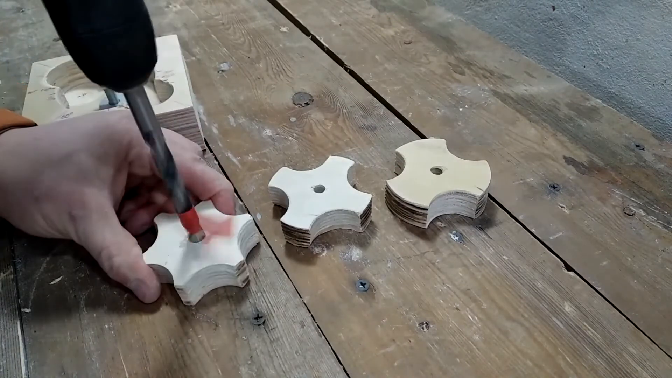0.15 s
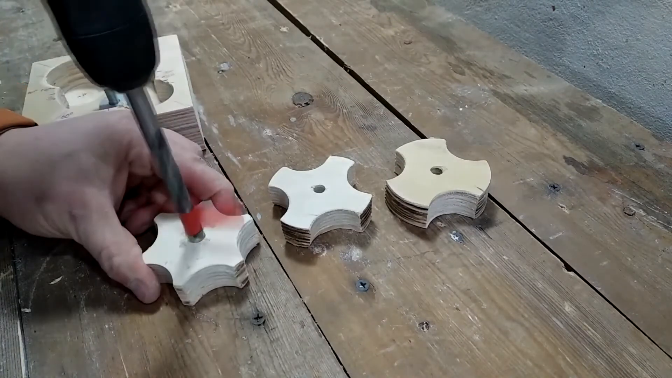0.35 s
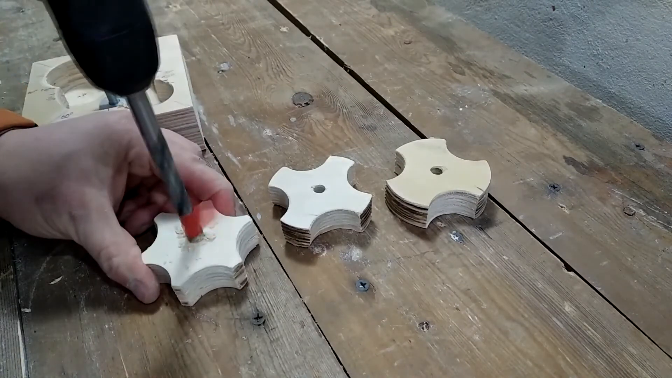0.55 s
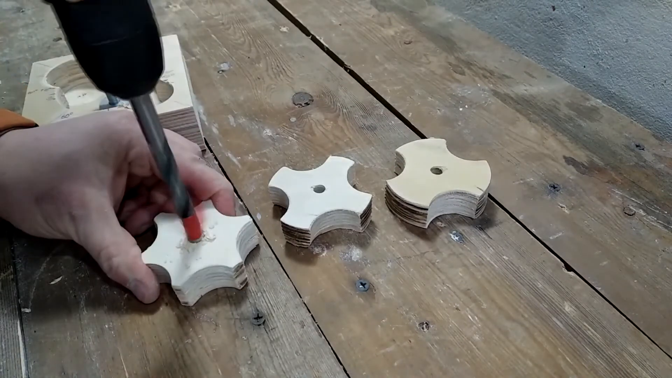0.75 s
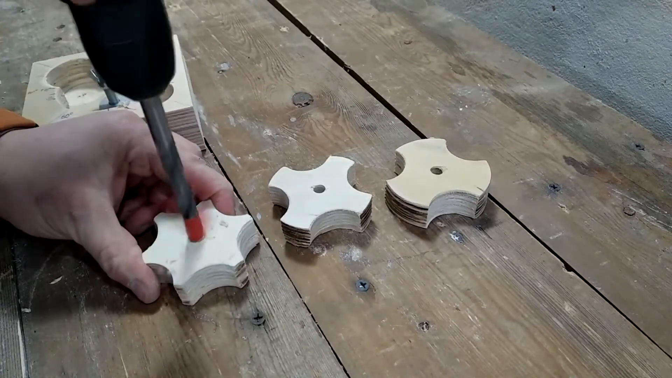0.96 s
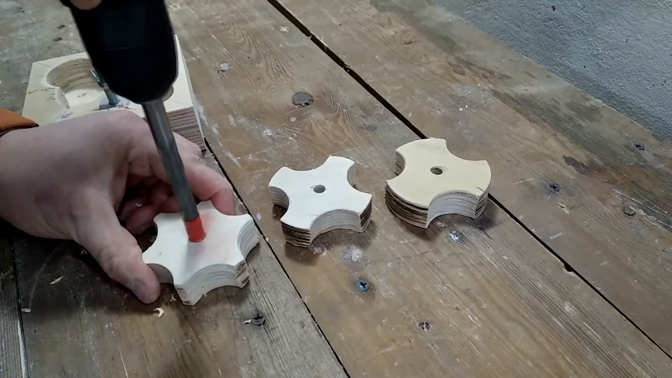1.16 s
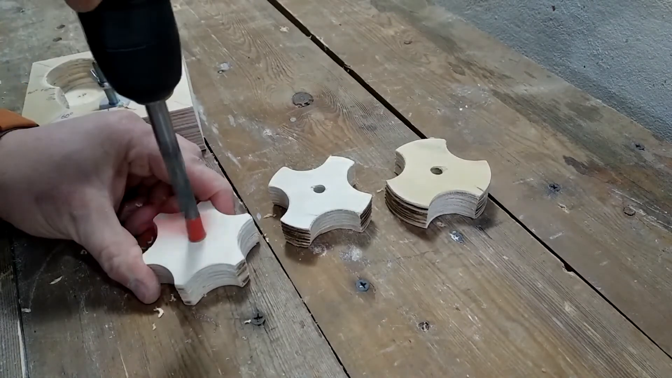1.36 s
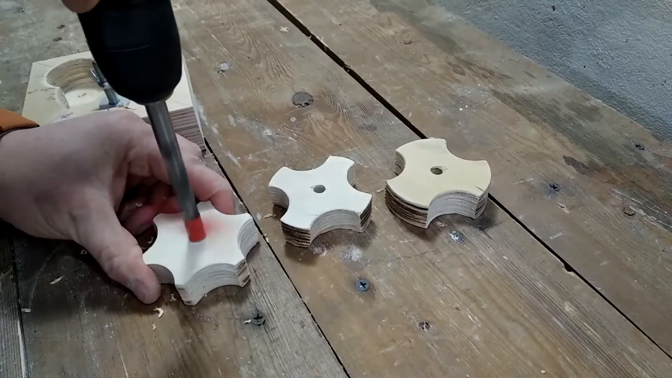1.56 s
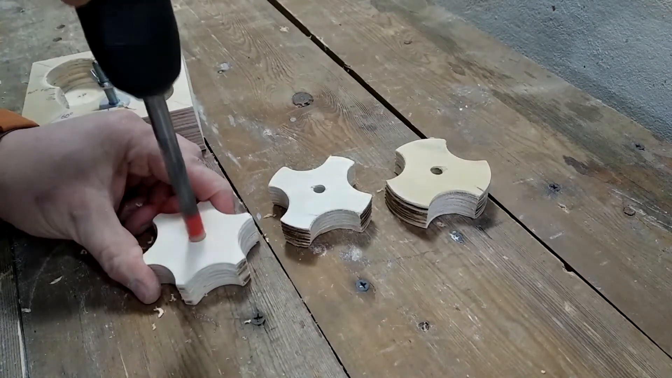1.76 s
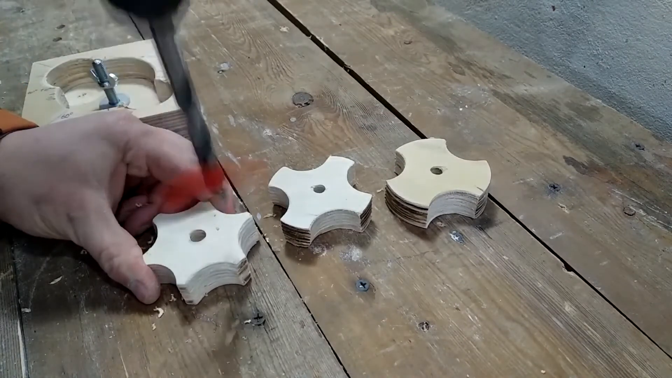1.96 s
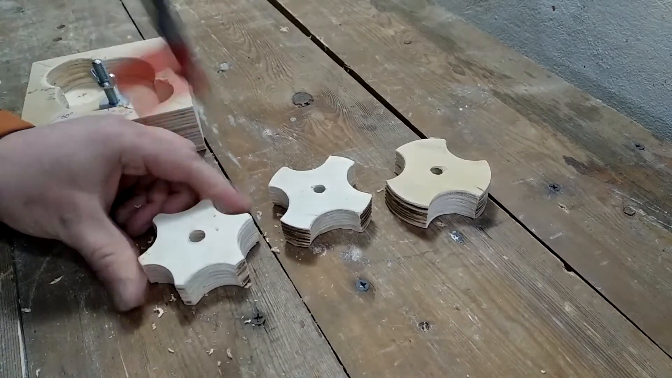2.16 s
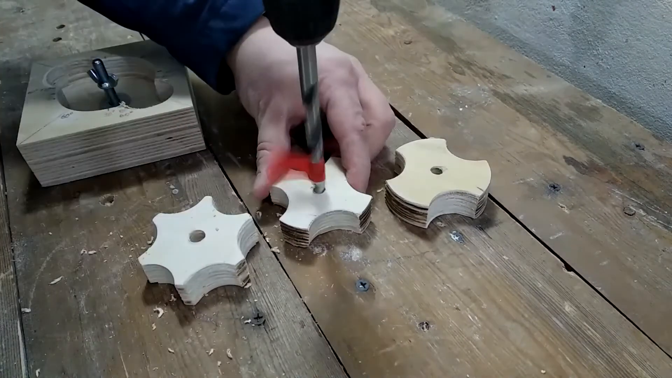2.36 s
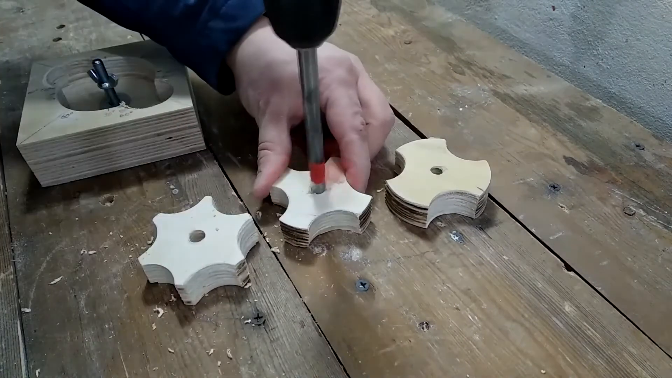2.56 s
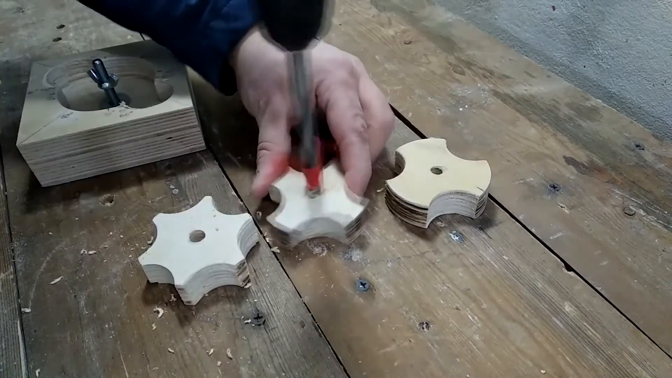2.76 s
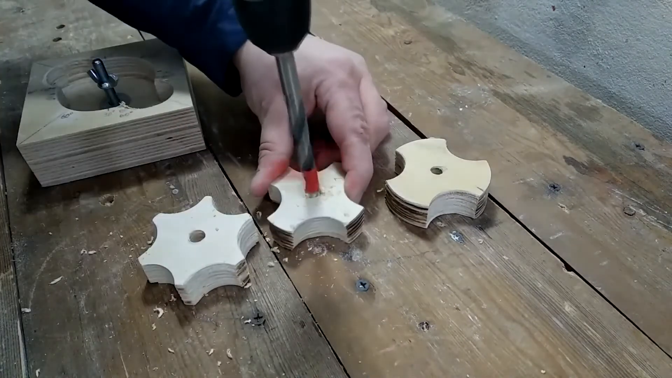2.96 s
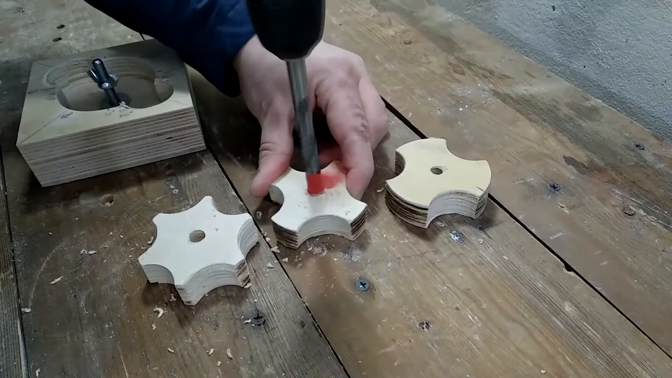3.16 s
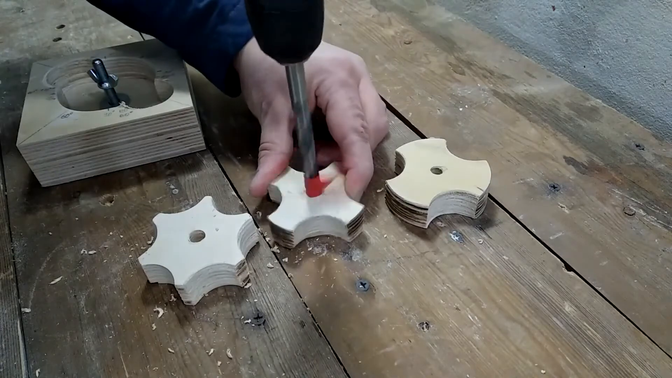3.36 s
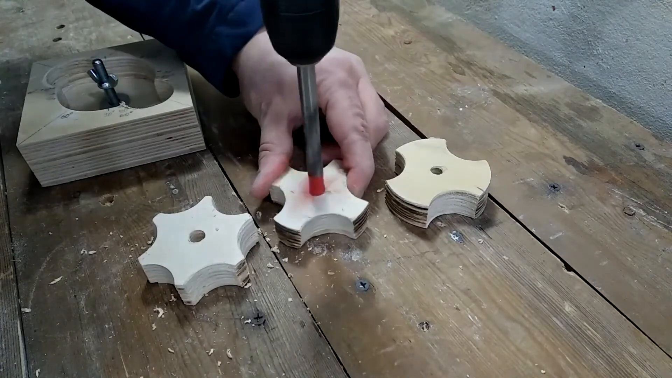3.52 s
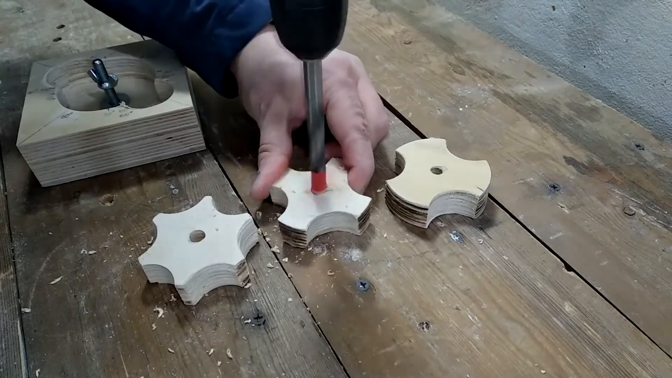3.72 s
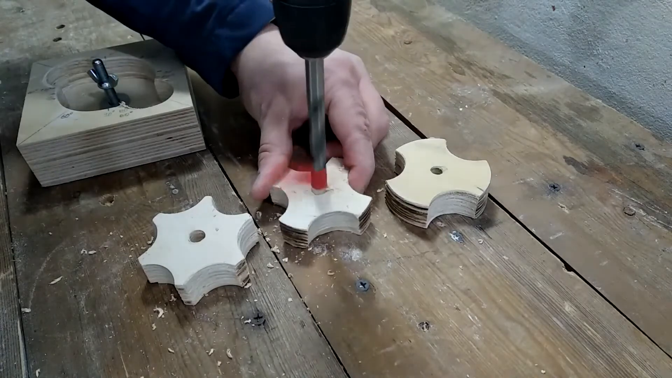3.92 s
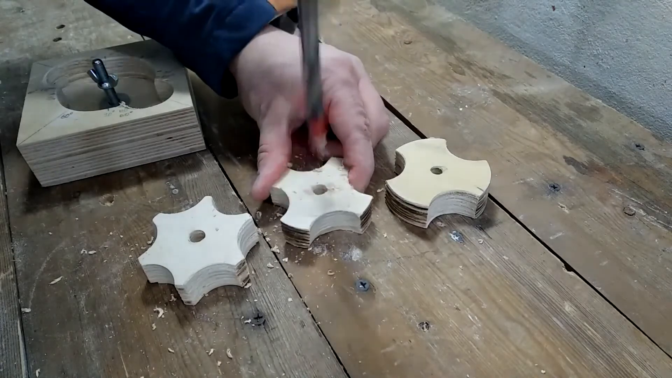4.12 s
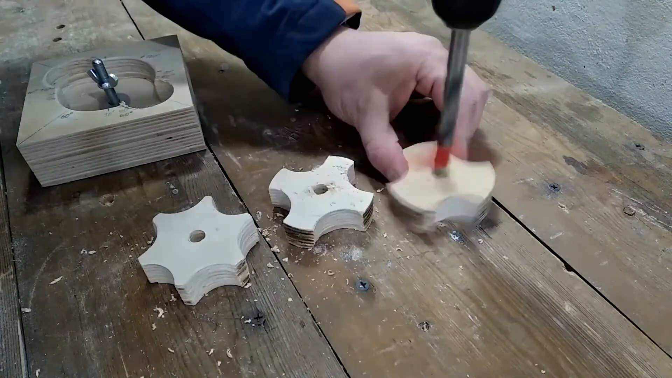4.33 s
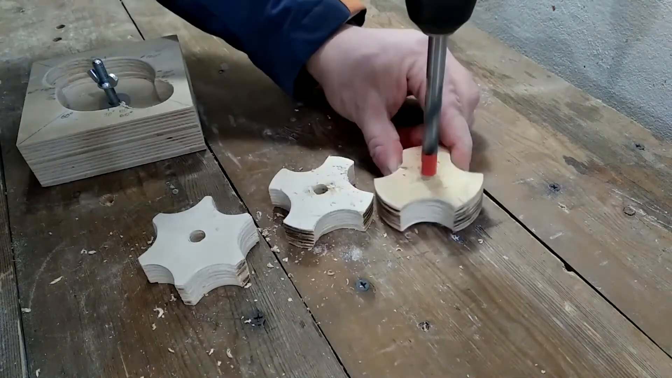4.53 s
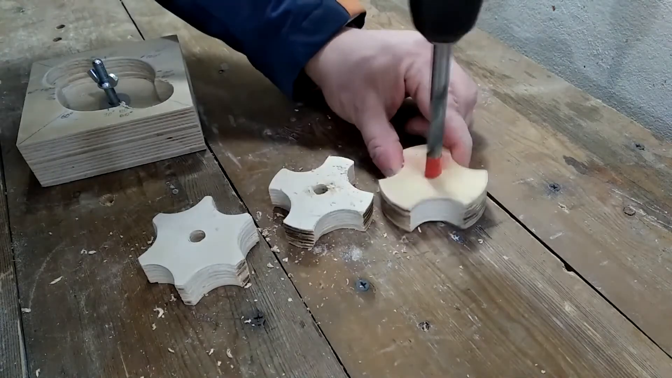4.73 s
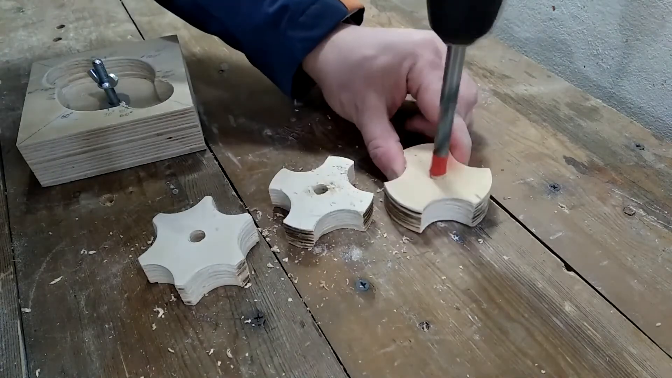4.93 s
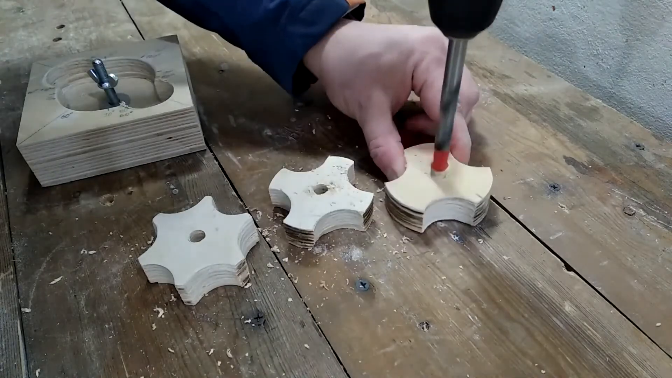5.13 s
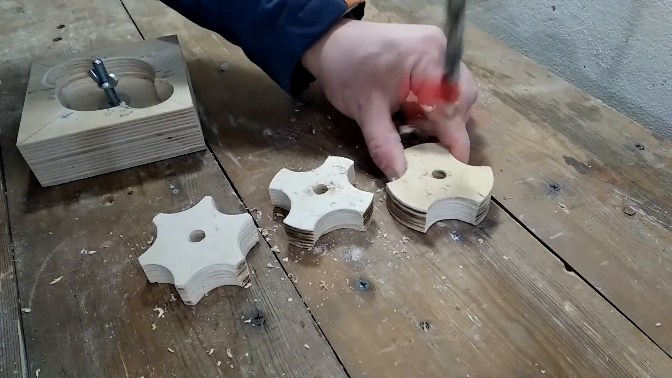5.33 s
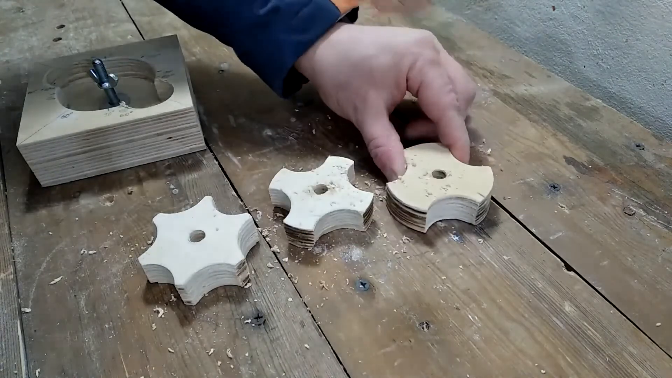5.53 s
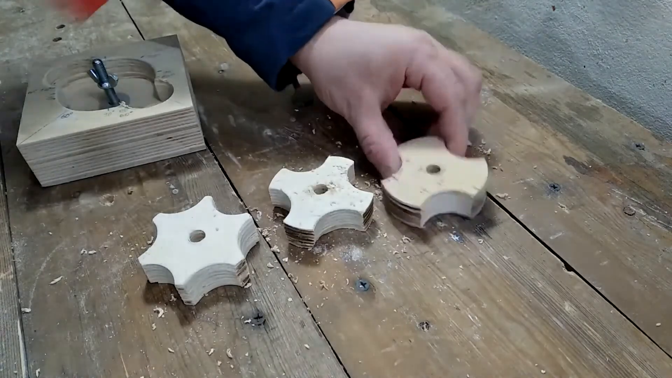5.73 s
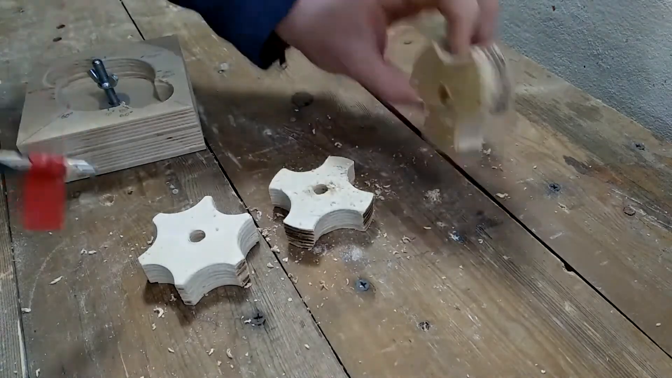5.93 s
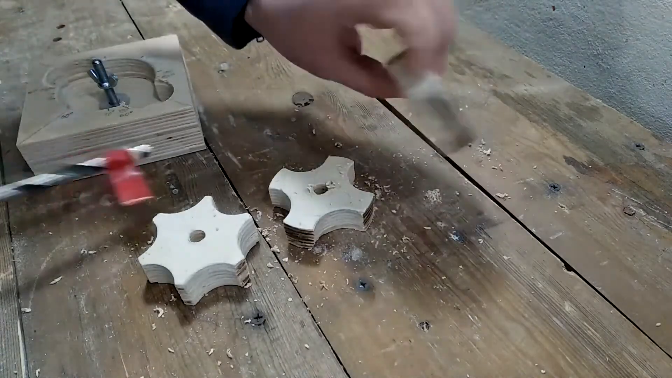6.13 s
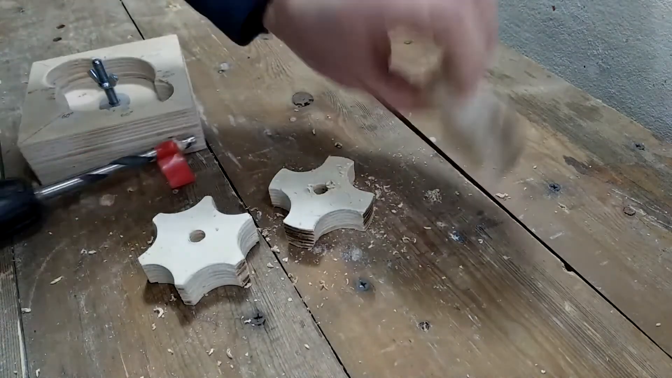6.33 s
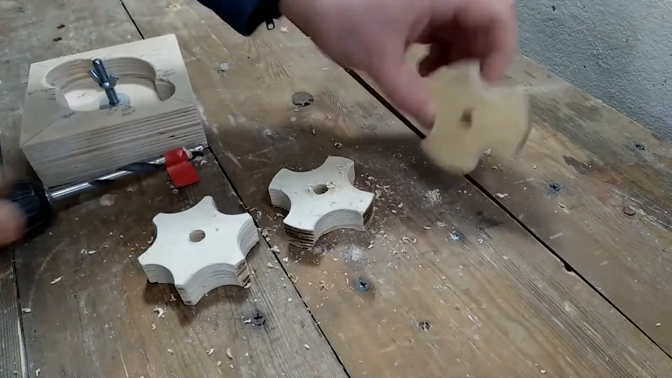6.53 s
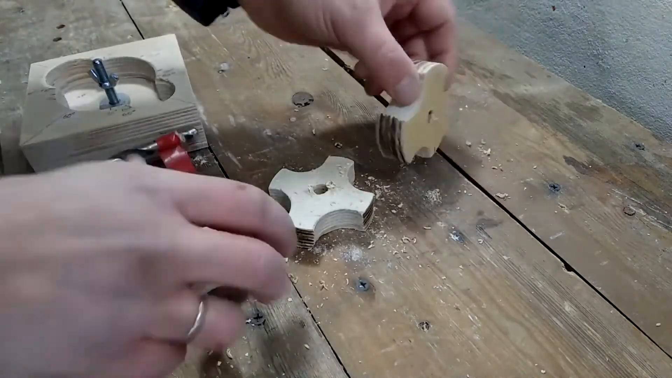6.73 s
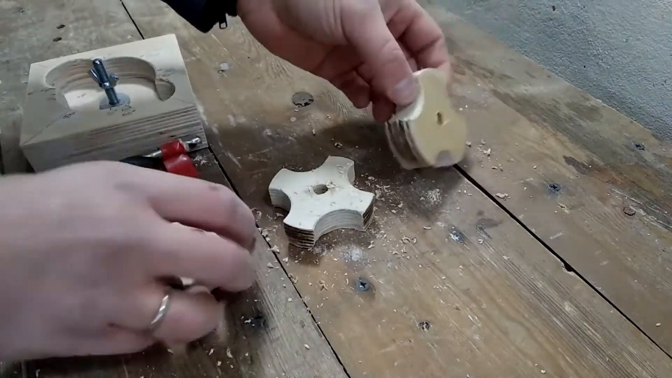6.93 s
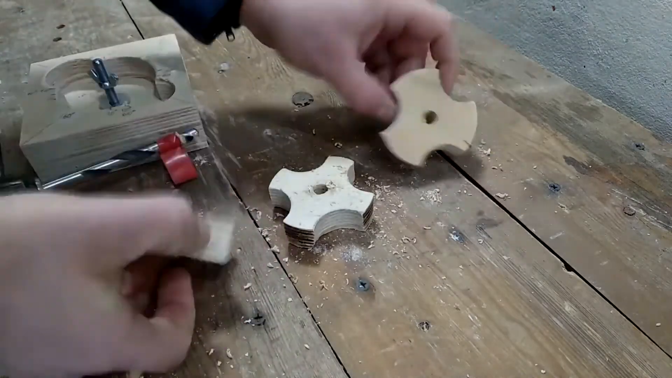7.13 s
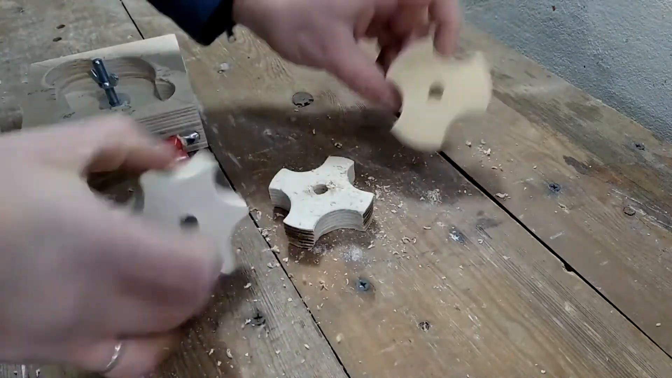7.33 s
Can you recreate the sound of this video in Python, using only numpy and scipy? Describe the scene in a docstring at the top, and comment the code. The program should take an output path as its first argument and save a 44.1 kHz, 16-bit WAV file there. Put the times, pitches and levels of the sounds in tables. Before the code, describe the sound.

Close by in a small workshop, a drill bit tears through plywood three times with short breaks between, hissing and scratching over a motor whine that dips and climbs. Brief high squeals and a rough groan come from the binding bit. After the drilling stops, cloth brushes softly, the drill is set down with a quick clatter, and a few wooden knocks thud and ring on the bench planks.

```python
"""A cordless drill rasps and whines, boring out three plywood knobs on a plank bench in three short bouts.
The bit tears fibres, pinches chips, squeals and groans by stick-slip, and snags as it is pulled out;
the motor's whine glides with the shaft speed. Then a sleeve rustles, the drill is put down and the
knobs knock on the planks, which thud, ring and rattle in a small workshop."""
import sys
import numpy as np
from scipy import signal
from scipy.fft import rfft, irfft, next_fast_len
from scipy.io import wavfile

SR = 44100
rng = np.random.default_rng(int(sys.argv[2]) if len(sys.argv) > 2 else 0)


def unload_wav(signal):
    """Save mono or channel-first audio to the path in sys.argv[1] as 16-bit WAV at rate SR, clipped to [-1, 1]."""
    wavfile.write(
        sys.argv[1],
        SR,
        np.round(np.clip(np.atleast_2d(signal).T, -1, 1) * 32767).astype(np.int16),
    )


N = 329868
TIME = np.arange(N) / SR
# how hard the bit cuts, per bout: (time [s], feed [dB])
FEED_CURVES = [
    [(0.0, -42), (0.03, -40.5), (0.28, -44.5), (0.31, -38), (0.59, -36.5), (0.62, -40), (0.71, -38.5),
     (2.0, -31.5), (2.05, -30.5)],
    [(2.335, -86), (2.345, -53), (2.548, -35.5), (2.824, -33), (2.834, -31), (2.954, -36), (3.162, -33.5),
     (4.084, -34), (4.21, -40)],
    [(4.22, -61), (4.26, -42), (4.33, -30.5), (4.43, -27.5), (4.646, -27), (4.66, -31), (4.728, -26),
     (5.278, -43), (5.504, -38), (5.53, -44)],
]


def amp(db):
    """Decibels to gain."""
    return 10 ** (np.asarray(db) / 20)


def unit(x):
    """Scale to rms 1."""
    return x / np.sqrt(np.mean(x ** 2) + 1e-20)


def read(points, hz):
    """Interpolate a table over log frequency."""
    f, value = np.transpose(points)
    return np.interp(np.log(hz + 1), np.log(f + 1), value)


def level(s, db, fade_s=0.0012):
    """Gain along a dB curve, dying quickly outside it."""
    outside_s = np.maximum(np.maximum(s[0] - TIME, TIME - s[-1]), 0)
    return amp(np.interp(TIME, s, db)) * np.exp(-outside_s / fade_s)


def feed_gain():
    """Gain that follows the feed through all bouts."""
    return sum(level(*np.transpose(curve)) for curve in FEED_CURVES)


def swell(start_s, length_s, ramp_s):
    """Gain that rises smoothly, holds and falls."""
    inside_s = np.minimum(TIME - start_s, start_s + length_s - TIME)
    return np.sin(np.pi / 2 * np.clip(inside_s / ramp_s, 0, 1))


def colour(x, points):
    """Filter by a spectrum table."""
    size = next_fast_len(x.shape[-1])
    gain = amp(read(points, np.fft.rfftfreq(size, 1 / SR)))
    return irfft(rfft(x, size) * gain, size)[..., :x.shape[-1]]


def noise(size=N):
    """White noise as (mid, side)."""
    return rng.standard_normal((2, size))


def wander(per_s):
    """Random drift of rms 1."""
    return unit(np.interp(TIME * per_s, np.arange(SR), rng.standard_normal(SR)))


def resonate(x, hz, width_hz):
    """One resonance of peak gain 1."""
    return signal.lfilter(*signal.iirpeak(hz, hz / max(width_hz, 2), fs=SR), x)


def body(x, modes):
    """Parallel resonances, each widened and applied twice for deep valleys; rms 1."""
    return unit(sum(amp(db) * resonate(resonate(x, hz, 1.24 * width), hz, 1.24 * width)
                    for hz, width, db in modes))


def add(mix, start_s, sound):
    """Mix a sound in at a time."""
    part = mix[:, max(round(start_s * SR), 0):][:, :sound.shape[-1]]
    part += sound[..., :part.shape[1]]


def fibres(per_s, spread_db, snap_ratio):
    """Fibre snaps of uneven size over smooth friction."""
    snaps = noise() * amp(spread_db * np.minimum(rng.exponential(1, N), 2))
    snaps *= rng.random(N) < per_s / SR
    return unit(snap_ratio * unit(snaps) + noise())


def patchy(x, depth_db, width_hz, length_s):
    """Each band of a rubbing sound swells and fades on its own as the contact shifts."""
    bands = signal.stft(x, SR, nperseg=1024, noverlap=768)[2]
    field = rng.standard_normal(bands.shape[1:])
    for axis, span in enumerate([width_hz * 1024 / SR, length_s * SR / 256]):
        bell = np.exp(-2 * (np.arange(-30, 31) / span) ** 2)
        field = signal.fftconvolve(field, np.expand_dims(bell, 1 - axis), "same")
    bands *= amp(depth_db * np.clip(unit(field), -2, 2))
    return unit(signal.istft(bands, SR, nperseg=1024, noverlap=768)[1][:, :N])


def air(level_db=-67):
    """Steady hush of the workshop's still air."""
    spectrum = [(30, -6.5), (60, -13), (130, 2), (500, 2), (1400, -7), (4000, -10.5), (9000, -6),
                (14400, -9), (16000, -17.5)]  # (frequency [Hz], density [dB])
    return amp(level_db) * unit(colour(noise(), spectrum))


def boring(hiss_db=-1.7, usual_feed_db=-36, rumble_fade_db_per_s=7, rasp_fade_db_per_s=2):
    """The edges tear fibres: chips hiss, bit and knob ring, the bench rumbles; all follow the feed."""
    # cutting noise, per knob: (frequency [Hz], density [dB])
    chip_spectra = [
        [(820, -58), (1400, -5), (2190, 2.5), (2310, -6), (2500, 4.5), (3150, 0), (3450, -1), (3720, -10),
         (4080, 1), (4650, -3.5), (5160, -13.5), (5660, -1.5), (7010, -0.5), (7600, -3.5), (8080, -4),
         (12000, -6), (16000, -14)],
        [(820, -60.5), (1400, -54), (1770, 0), (1940, 12), (2580, 7), (3070, 9.5), (3840, 4), (4210, 5),
         (4520, 5.5), (7450, 9), (10300, 0), (12000, 4.5), (13000, -3), (15100, -2), (16000, -8)],
        [(820, -55), (1400, -5.5), (1700, -10), (1810, -8), (2500, -10), (2850, -20.5), (3260, -12.5),
         (3580, -11.5), (4250, -17), (4760, -11.5), (5200, -6), (5400, -15.5), (5950, -7.5), (11900, -10.5),
         (14900, -19.5), (16000, -20.5)],
    ]
    # resonances: (frequency [Hz], nominal width [Hz], level [dB])
    wood_modes = [
        [(594, 65, 5.5), (1055, 350, 3), (1520, 170, -3)],
        [(564.7, 31, -1), (1007, 700, -5.5), (1566, 131, -12.5)],
        [(616, 190, 6), (946, 250, 4), (1460, 140, -21), (1678, 94, 1.5)],
    ]  # knob and plank, per bout
    steel_modes = [(2615, 650, 6), (2900, 200, 11.5), (3447, 414, 6.5), (4060, 670, 3), (4820, 740, -6.5),
                   (5470, 560, 4.5), (5890, 120, -4), (6930, 68, 6), (7140, 73, -1)]  # bit and chuck
    rumble_modes = [(98, 120, -19), (136.6, 50, 4), (176, 138, 0.5), (253, 30.4, 6), (329, 66, 3.5),
                    (432, 374, 3.5)]  # bench
    # per hole, at the usual feed: (breakthrough [s], rasp [dB], entry rumble [dB], steel ring [dB])
    holes = [(1.95, -40, -42, -68), (3.55, -43, -46.5, -51), (4.7, -46.5, -50, -46)]
    out = np.zeros((2, N))
    bite = amp(.8 * wander(55) + .6 * wander(400))
    tearing = fibres(per_s=1500, spread_db=3.5, snap_ratio=.55) * bite
    tearing = patchy(tearing, depth_db=2.4, width_hz=900, length_s=.02)
    tearing = patchy(tearing, depth_db=5.5, width_hz=41, length_s=.11) * amp(.75 * wander(12))
    steel = body(patchy(tearing, depth_db=3, width_hz=200, length_s=.1), steel_modes)
    bench = body(noise(), rumble_modes) * amp(2 * wander(30))
    for curve, hole, chips, wood in zip(FEED_CURVES, holes, chip_spectra, wood_modes):
        through_s, rasp_db, rumble_db, steel_db = hole
        s, feed_db = np.transpose(curve)
        push_db = feed_db - usual_feed_db
        steadied_db = rumble_fade_db_per_s * np.maximum(TIME - s[0], 0)  # the hole steadies the bit
        freed_db = rasp_fade_db_per_s * np.maximum(TIME - through_s, 0)
        out += level(s, feed_db + hiss_db) * unit(colour(tearing, chips))
        out += level(s, steel_db + .1 * push_db) * steel
        out += level(s, rasp_db + .56 * push_db) * amp(-freed_db) * body(tearing, wood)
        out += level(s, rumble_db + .65 * push_db) * amp(-steadied_db) * bench
    return out


def squeaks(gain_db=-10.5, per_s=120, length_s=.032, low_hz=2900, high_hz=5900, jitter=.075, spread_db=9):
    """Chips pinched in the flutes give a crowd of brief scratchy squeaks that follows the feed."""
    out, window = np.zeros((2, N)), np.hanning(int(length_s * SR))
    for when, pitch, size, side_turns in rng.random((int(per_s * N / SR), 4)):
        hz = low_hz * (high_hz / low_hz) ** pitch * (1 + jitter * rng.standard_normal(len(window)))
        phase = 2 * np.pi * (np.cumsum(hz) / SR + np.array([[0], [side_turns]]))
        add(out, when * N / SR, amp(spread_db * size) * window * np.sin(phase))
    return amp(gain_db) * unit(out) * feed_gain()


def crumbs(gain_db=-13, per_s=45, length_s=.02, low_hz=3300, high_hz=13000, q=14, spread_db=8):
    """Chips crackle out of the flutes: many small pitched crunches and a few large clumps."""
    clumps = [(0.373, 0.013, -32), (0.577, 0.018, -35.5), (0.689, 0.037, -37.5), (0.997, 0.038, -39),
              (1.057, 0.061, -37)]  # (centre [s], length [s], level [dB])
    clump_spectrum = [(1000, -6), (3000, 3), (5200, -7), (5800, -5), (9000, -4.5), (13000, -10),
                      (16000, -10)]  # (frequency [Hz], density [dB])
    crunches, window = np.zeros((2, N)), np.hanning(int(length_s * SR))
    snaps = fibres(per_s=2500, spread_db=3, snap_ratio=2)
    for when, pitch, size in rng.random((int(per_s * N / SR), 3)):
        hz = low_hz * (high_hz / low_hz) ** pitch
        start = int(when * (N - len(window)))
        burst = snaps[:, start:start + len(window)] * window
        add(crunches, start / SR, amp(spread_db * size) * unit(resonate(burst, hz, hz / q)))
    clump_gain = sum(amp(db) * swell(s - span / 2, span, span / 2) for s, span, db in clumps)
    return amp(gain_db) * unit(crunches) * feed_gain() + clump_gain * unit(colour(snaps, clump_spectrum))


def motor(whine_db=-3.5, light_load_hz=450, flutter_db=2.2, growl_db=-50, usual_whine_db=-42):
    """Shaft orders whine, rougher the higher the order and the slower the loaded shaft; gears growl."""
    # motor under trigger and load, per bout: (time [s], shaft speed [Hz], whine [dB])
    speed_curves = [
        [(0.02, 348.7, -49.5), (0.3, 330, -44.5), (0.42, 259.6, -43.5), (0.5, 230, -44.5), (0.6, 190.4, -45),
         (0.68, 227.2, -41.5), (0.745, 231.5, -39.5), (0.82, 191.1, -38), (0.87, 211, -43), (0.91, 232.6, -41),
         (0.97, 193.3, -43), (1.06, 261.8, -39.5), (1.13, 315, -46), (1.18, 307.5, -39), (1.25, 349.6, -38.5),
         (1.33, 366.7, -44), (1.4, 417, -41), (1.46, 453, -38), (1.53, 470, -41), (1.6, 495, -48),
         (1.72, 186, -57), (1.76, 199.4, -30.5), (1.8, 244.8, -46), (1.86, 279.2, -52), (1.93, 296, -44.5),
         (2.04, 265, -37)],
        [(2.79, 350, -38.5), (2.83, 301, -36.5), (2.85, 257, -37), (2.88, 239, -42.5), (2.93, 250.4, -44),
         (3.0, 217, -44.5), (3.05, 254.7, -39), (3.1, 296, -39.5), (3.22, 314, -39), (3.28, 270, -39.5),
         (3.34, 256.9, -47), (3.39, 274.5, -41), (3.42, 229, -42), (3.5, 315.7, -40), (3.54, 334.6, -35),
         (3.57, 380, -39), (3.61, 377, -47), (3.67, 422.5, -52), (3.82, 480, -45.5), (3.96, 345, -58)],
        [(4.86, 357.3, -63), (4.89, 363, -41), (4.96, 387, -58), (5.0, 336.5, -49), (5.05, 299.7, -55),
         (5.12, 406, -72), (5.16, 341.5, -63), (5.2, 302.4, -53), (5.25, 310, -48), (5.32, 385, -60),
         (5.38, 432, -45), (5.44, 439, -56), (5.48, 436, -46)],
    ]
    orders = [(1, 3), (2, -12), (3, 1), (4, -9), (6, -9), (8, -7)]  # (multiple of shaft speed, level [dB])
    radiation = [(200, -23), (290, -14), (350, -13), (450, -4.5), (650, 0.5), (1230, 4.5), (1450, -16.5),
                 (1700, -1), (2800, -3), (4000, -24)]  # from knob and housing: (frequency [Hz], gain [dB])
    housing_modes = [(1090, 270, 3), (1207, 93, -3.5)]  # (frequency [Hz], nominal width [Hz], level [dB])
    s, hz, _ = np.concatenate(speed_curves).T
    shaft_hz = np.interp(TIME, s, hz)
    load = light_load_hz / shaft_hz
    phase = 2 * np.pi * np.cumsum(shaft_hz * (1 + .011 * load * wander(90))) / SR
    whine = np.zeros(N)
    for order, db in orders:
        rough = .135 * order * load
        shake = (1 + rough * (wander(130) + 1j * wander(130))) / np.sqrt(1 + 2 * rough ** 2)
        gain = amp(db + read(radiation, order * shaft_hz) + flutter_db * wander(35))
        whine += gain * (shake * np.exp(1j * order * phase)).real
    growl = body(noise()[0] * (1 + np.cos(phase)), housing_modes)
    bouts = [np.transpose(curve) for curve in speed_curves]
    whine_gain = sum(level(s, db + whine_db) for s, _, db in bouts)
    growl_gain = sum(level(s, growl_db + .6 * (db - usual_whine_db)) for s, _, db in bouts)
    return np.sqrt(2) * whine_gain * whine + growl_gain * growl


def squeals(gain_db=1.2, jitter=.009, arch=.02):
    """The bit sticks and slips on the wall of the hole: short tones that arch in pitch."""
    events = [(0.452, 0.045, 4460, -46), (0.49, 0.038, 4440, -42), (0.698, 0.06, 4040, -41.5),
              (0.725, 0.041, 4100, -40), (0.764, 0.07, 3980, -41.5), (0.838, 0.037, 4440, -49),
              (0.89, 0.027, 4690, -39), (0.914, 0.025, 4020, -36), (0.992, 0.037, 4050, -38),
              (1.012, 0.051, 4820, -39), (1.033, 0.031, 4060, -37), (1.091, 0.049, 4070, -41),
              (1.226, 0.029, 4030, -43), (1.258, 0.037, 4068, -41), (1.336, .03, 4400, -42),
              (1.421, 0.029, 4097, -38), (4.426, 0.057, 5420, -29), (4.467, 0.021, 4800, -27),
              (4.481, 0.025, 4756, -28.5), (4.521, .028, 4760, -25), (4.557, 0.021, 4840, -27),
              (4.591, 0.031, 4750, -32), (4.604, .018, 4800, -28), (4.629, 0.016, 4730, -21),
              (4.64, 0.023, 4720, -28.5), (4.648, 0.033, 5500, -35), (4.675, .02, 4650, -37),
              (4.738, 0.033, 4786, -25.5), (4.79, 0.052, 4830, -31)]  # (centre [s], length [s], pitch [Hz], level [dB])
    out, slip = np.zeros((2, N)), wander(700)
    quadrature = np.array([[0], [np.pi / 2]])
    for s, length_s, hz, db in events:
        u = np.linspace(-1, 1, int(length_s * SR))
        bend = 1 - arch * u ** 2 + jitter * slip[int(s * SR):][:len(u)]
        phase = 2 * np.pi * np.cumsum(hz * bend) / SR
        window = np.cos(np.pi / 2 * u) ** 3.3
        add(out, s - length_s / 2, amp(db + gain_db) * np.sqrt(2) * window * np.sin(phase + quadrature))
    return out


def chatter(gain_db=-2, stutter_db=4.5, ramp_s=.051):
    """Single resonances sound with stuttering noise: the bit sticks and slips, and near 3 kHz the motor whines
    high."""
    # (start [s], length [s], frequency [Hz], nominal width [Hz], level [dB])
    rubs = [(1.46, 0.38, 2946, 80, -44), (1.96, 0.18, 2950, 80, -49), (0.66, 0.63, 4060, 120, -50),
            (2.466, 0.23, 153, 80, -44), (2.466, 0.28, 290.5, 160, -45.5), (3.666, 0.61, 3107, 166.7, -44),
            (4.33, 0.16, 260, 30.03, -39), (4.43, 0.37, 4780, 125, -36.5), (4.533, 0.31, 970, 29.6, -39),
            (4.56, .3, 1492, 50.3, -42), (5.063, 0.18, 3193, 40, -50), (5.197, 0.22, 3455, 29.8, -44.5),
            (6.6, 0.18, 2900, 110, -63)]
    stutter_noise = noise() * amp(stutter_db * wander(40))
    return sum(amp(db + gain_db) * swell(s, length_s, ramp_s) * body(stutter_noise, [(hz, width_hz, 0)])
               for s, length_s, hz, width_hz, db in rubs)


def snags(rise_s=.004914, fall_s=.003978, low_hz=330, low_db=-11, rip_db=-1):
    """A flute catches: a brief swell in which the knob rocks on the plank and fibres rip."""
    catches = [(1.756, -31.5, 590.5, -8), (2.0164, -25.5, 733.5, -10), (2.025, -36.5, 870, 5),
               (2.043, -27.5, 804, 2), (2.388, -43, 1012, 4), (5.484, -41, 696.8, 7), (5.495, -36, 1320, 2),
               (5.504, -49, 650, 13.5), (5.521, -37, 690, 1.5)]  # (peak [s], level [dB], rocking [Hz], relative rip [dB])
    rip_spectrum = [(300, -21.5), (1200, 9.5), (3000, 4), (4100, -21), (5000, -1.5), (7000, 1.5),
                    (12000, -17), (16000, -40)]  # (frequency [Hz], density [dB])
    out, t = np.zeros((2, N)), np.arange(-1000, 2000) / SR
    window = np.exp(-abs(t / np.where(t < 0, rise_s, fall_s)) ** 3.8)
    for s, db, hz, relative_db in catches:
        jerk = amp(relative_db + rip_db) * unit(colour(noise(len(t)), rip_spectrum))
        rocking = np.sin(2 * np.pi * hz * t) + amp(low_db) * np.sin(2 * np.pi * low_hz * t)
        jerk[0] += np.sqrt(2) * rocking
        add(out, s + t[0], amp(db) * window * jerk)
    return out


def groans(jitter=.016, flutter_db=2.5, rough_rad=.25):
    """The bit binds and slips: a rough hollow tone whose partials flutter on their own."""
    slip_curves = [
        [(2.5, 278, -52), (2.63, 279.4, -45.5), (2.76, 274.2, -44.5), (2.95, 273, -56.5)],
        [(4.27, 284, -52), (4.3, 284, -40), (4.35, 277.8, -45), (4.41, 274.7, -36.5), (4.5, 278.4, -42),
         (4.58, 273.7, -40), (4.63, 256.3, -44), (4.68, 279, -44), (4.74, 276, -36), (4.83, 278.4, -39),
         (4.87, 274.6, -49), (4.95, 282, -44), (5.0, 279.4, -57)],
    ]  # second and third hole: (time [s], slip rate [Hz], level [dB])
    partials = [(1, -13), (2, 0.5), (3, -12), (4, -12), (6, -23.5)]  # (multiple of slip rate, level [dB])
    s, hz, _ = np.concatenate(slip_curves).T
    phase = 2 * np.pi * np.cumsum(np.interp(TIME, s, hz) * (1 + jitter * wander(120))) / SR
    tone = sum(amp(db + flutter_db * wander(30)) * np.sin(k * phase + rough_rad * wander(150))
               for k, db in partials)
    return unit(tone) * sum(level(s, db) for s, _, db in map(np.transpose, slip_curves))


def sleeve(gain_db=-3.5, ramp_s=.066):
    """Cloth and skin brush in overlapping strokes."""
    strokes = [(5.497, 0.41, -57.5), (5.89, 0.074, -45), (5.932, 0.21, -50), (6.096, 0.59, -65.5),
               (6.551, 0.24, -52), (6.848, 0.18, -58), (7.016, 0.12, -56), (7.18, 0.25, -77)]  # (start [s], length [s], level [dB])
    cloth_spectrum = [(100, -15), (200, 0), (600, 1.5), (1100, -4), (1700, -11.5), (3000, -4.5), (5000, -6),
                      (9400, -5), (12500, -7), (16000, -9.5)]  # (frequency [Hz], density [dB])
    brush = fibres(per_s=700, spread_db=3, snap_ratio=.5)
    brush = patchy(brush, depth_db=2.6, width_hz=220, length_s=.04)
    power = sum((amp(db) * swell(s, length_s, ramp_s)) ** 2 for s, length_s, db in strokes)
    return amp(gain_db) * np.sqrt(power) * unit(colour(brush, cloth_spectrum))


def knocks(rise_s=.0013, thud_t60_s=.044, rattle_t60_s=.62, slap_t60_s=.025, crack_t60_s=.12):
    """Struck planks thud, damped by the piece on them, then ring and rattle; contact slaps and cracks."""
    # (time [s], level [dB], spot [0 under drill, 1 under knob], soft-contact corner [Hz],
    #  relative crack [dB], relative ring [dB])
    blows = [(5.780, -49, 1, 1170, -32, -10.5), (5.806, -55, 0.94, 1510, -26, -10),
             (6.343, -45, 0.71, 1400, 8, -3), (6.35, -32.5, 0.13, 1340, 0.5, 4),
             (6.357, -30, 0.18, 2500, -2.5, 4), (6.372, -31.5, 0.46, 1700, -8, -4),
             (6.429, -32.5, 0.96, 3500, -0.5, 2.5), (6.4368, -14, 1, 2570, -20, -13),
             (6.4597, -25.5, 0.59, 1496, -1.5, -3.5), (6.509, -31, 0.53, 1500, -3.5, 0),
             (6.552, -39.5, 0.59, 1500, -14, -2.5), (6.964, -62, 0.96, 714, -22.5, 0.5),
             (7.004, -76, 0.81, 805, -17.5, -7.5), (7.169, -43.5, 0.6, 1535, -12, 1),
             (7.179, -24, 0.93, 950, -19, -9), (7.4445, -31.5, 0.78, 450, -49, -7.5)]
    # (frequency [Hz], level struck under drill [dB], level struck under knob [dB], t60 [s])
    bench_modes = [(129.4, -6, -10, 0.71), (214.4, -1.5, -16.5, 0.64), (250, -10, 0, 0.23),
                   (334, -14, 4, 0.13), (441, -4.5, -4.5, 0.13), (473.5, 1, -16.5, 0.42),
                   (557, -9.5, 4.5, 0.39), (587.4, -5, 7.5, 0.23), (615, -1, -16.5, 0.33),
                   (730, -25, 4, 0.21), (911, 0, -14, 0.44), (992, -28.5, 3.5, 0.24),
                   (997, -6.5, -21.5, 0.46), (1140, -10, -19, .38), (1228, -10, -9, 0.47),
                   (1417, -24.5, -12, 0.36), (1517, -13.5, -23, 0.53), (1660, -22, -14, 0.36),
                   (1960, -22.5, -12, .15), (2580, -29, -26, 0.114)]
    # chuck and housing landing: (frequency [Hz], nominal width [Hz], level [dB])
    clack_modes = [(1250, 520, 4.5), (1990, 300, -9), (2750, 560, -2), (3950, 440, 0.5), (4400, 170, -9),
                   (5660, 230, -8), (6300, 110, -7), (7050, 420, -5.5), (7940, 350, -7),
                   (9900, 1300, -11.5), (11900, 760, -13)]
    rattle_spectrum = [(50, -59), (90, -23.5), (125, 12.5), (175, 3), (300, 1), (600, -7.5), (1150, -4),
                       (1700, -17.5), (3000, -14), (6000, -28), (16000, -33)]  # (frequency [Hz], density [dB])
    slap_spectrum = [(100, -11), (400, -1), (750, 4.5), (1100, 4), (1500, -20.5), (2300, -6.5), (3200, -19),
                     (16000, -37.5)]  # wood on wood: (frequency [Hz], density [dB])
    out, t = np.zeros((2, N)), np.arange(SR) / SR
    hz, drill_db, knob_db, t60_s = np.transpose(bench_modes)[:, :, None]
    thud = np.sin(2 * np.pi * hz * t) * amp(-60 * t / thud_t60_s)
    attack = 1 - np.exp(-(t / rise_s) ** 2)
    for s, db, spot, soft_hz, crack_db, ring_db in blows:
        mode_gain = amp(drill_db + spot * (knob_db - drill_db)) / np.sqrt(1 + (hz / soft_hz) ** 4)
        # waves return from the plank ends at any phase
        ring = amp(ring_db - 2 - 60 * t / t60_s) * np.sin(2 * np.pi * (hz * t + rng.random(hz.shape)))
        rattle = unit(colour(noise(SR), rattle_spectrum)) * amp(ring_db - 7 - 60 * t / rattle_t60_s)
        slap = unit(colour(noise(SR), slap_spectrum)) * amp(-3 - 60 * t / slap_t60_s)
        blow = signal.lfilter(*signal.butter(2, 1.48 * soft_hz, fs=SR), rattle + slap)
        blow += body(noise(SR), clack_modes) * amp(crack_db - 5 - 60 * t / crack_t60_s)
        blow[0] += (mode_gain * (thud + ring)).sum(0)
        add(out, s, amp(db) * attack * blow)
    return out


def workshop(x, gap_s=.004):
    """Diffuse room tail; each band dies at its own rate."""
    decay_times = [(100, 0.52), (300, 0.037), (1000, 0.28), (3000, 0.47), (8000, 0.33), (16000, 0.36)]  # (frequency [Hz], t60 [s])
    hz, t, bands = signal.stft(noise(SR), SR, nperseg=256)
    decay = amp(-60 * t / read(decay_times, hz)[:, None]) * (t > gap_s)
    tail = signal.istft(bands * decay, SR, nperseg=256)[1]
    return signal.fftconvolve(x, tail / np.linalg.norm(tail[0]), axes=1)[:, :N]


def scene(drill_wet_db=-10, knock_wet_db=-12):
    """Mix as mid and side, return left and right; only the treble is wide."""
    side_gain = [(100, -47), (3800, -107), (4500, -7), (5000, -5), (8000, -3.5), (16000, -1.5)]  # (frequency [Hz], gain [dB])
    drill = boring() + chatter() + squeals() + squeaks() + crumbs() + snags()
    blows = knocks()
    drill[0] += motor() + groans()
    direct = drill + blows + sleeve() + air()
    mid, side = direct + workshop(amp(drill_wet_db) * drill + amp(knock_wet_db) * blows)
    side = colour(side, side_gain)
    return np.array([mid + side, mid - side])


def record(dry, low_cut_hz=88, high_cut_hz=15800):
    """The microphone sheds the deep bass; a steep low-pass limits the band."""
    thin = signal.sosfilt(signal.butter(4, low_cut_hz, "high", fs=SR, output="sos"), dry)
    low_pass = signal.firwin(511, high_cut_hz, window=("kaiser", 9), fs=SR)
    return signal.oaconvolve(thin, low_pass[None], "same")


dry = scene()
out = record(dry)
unload_wav(out)
```